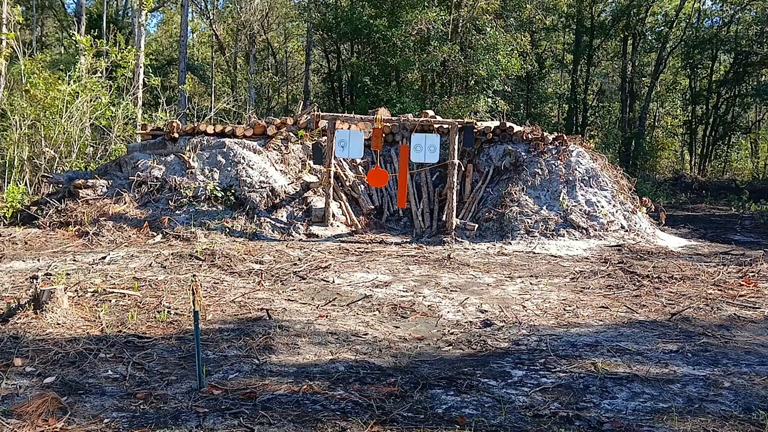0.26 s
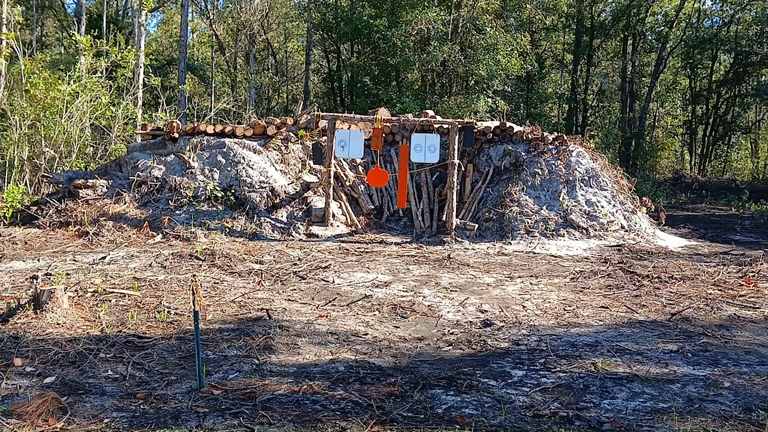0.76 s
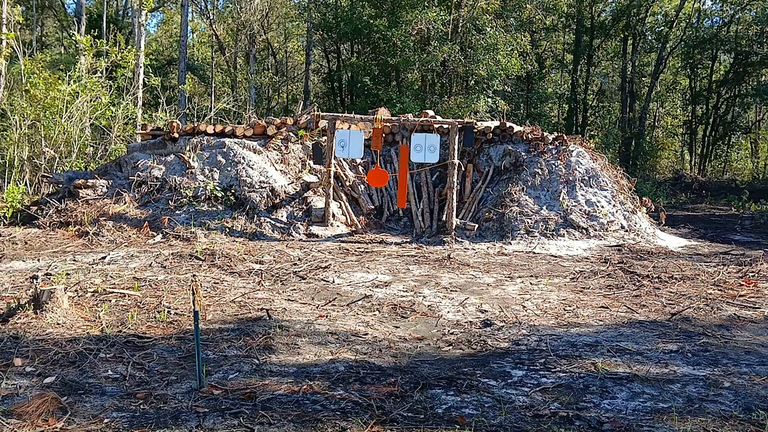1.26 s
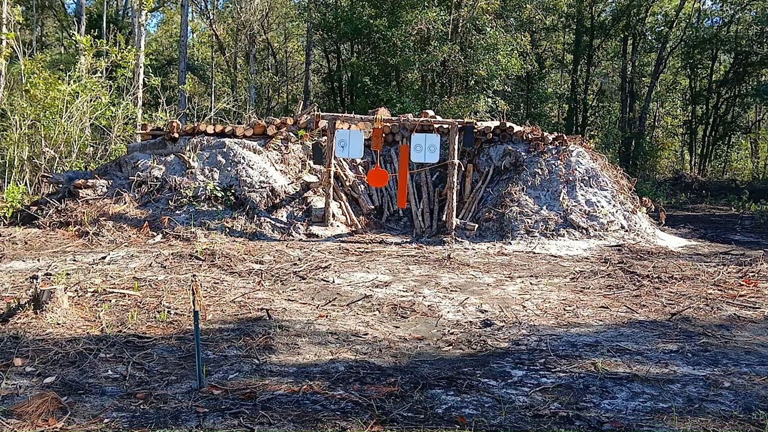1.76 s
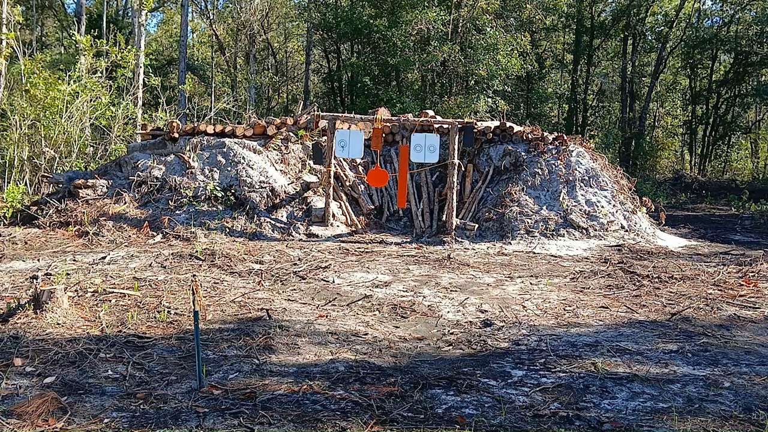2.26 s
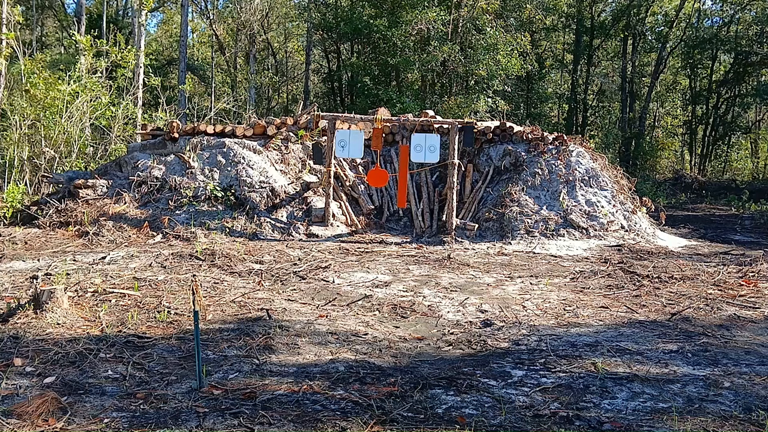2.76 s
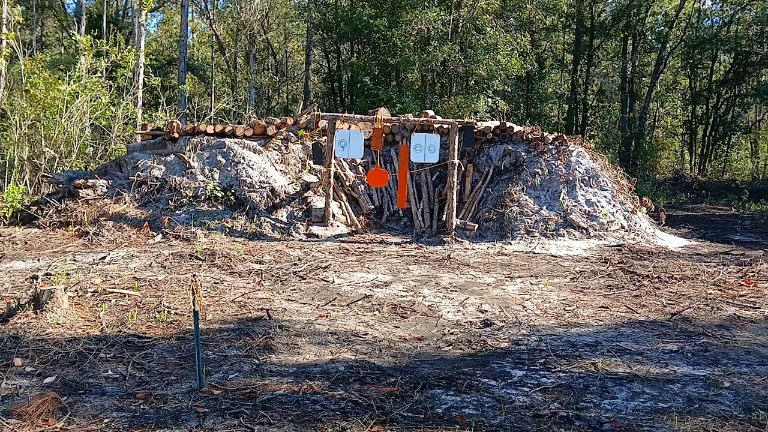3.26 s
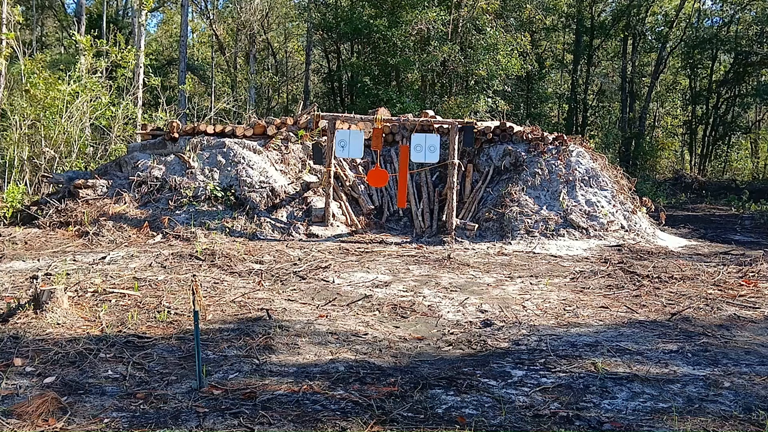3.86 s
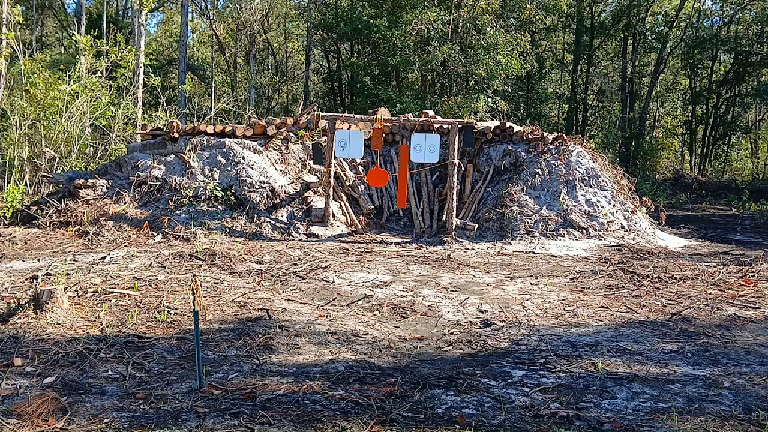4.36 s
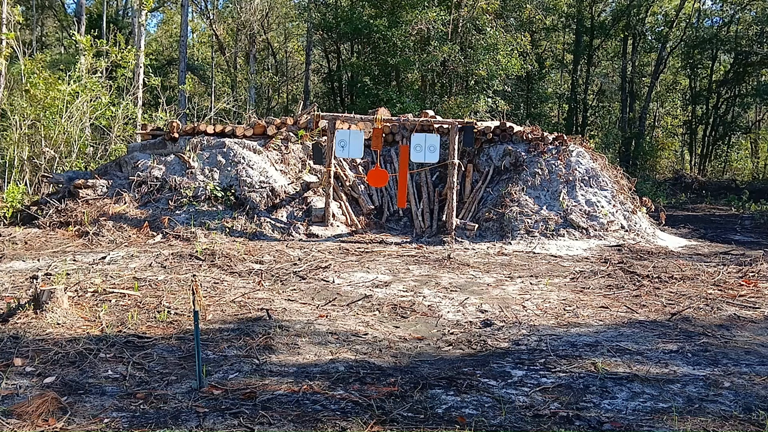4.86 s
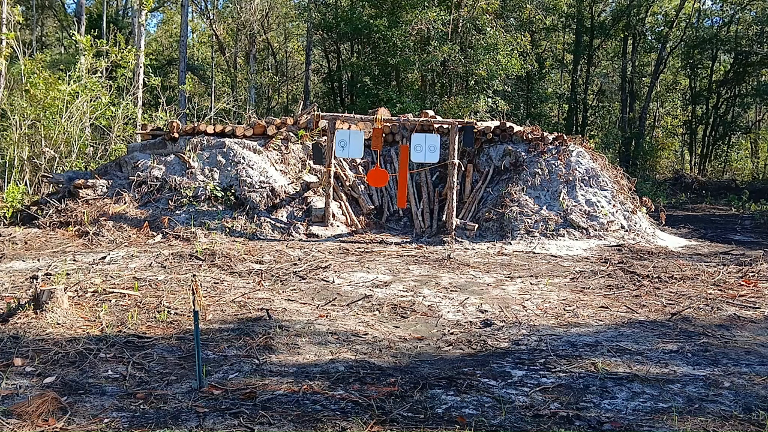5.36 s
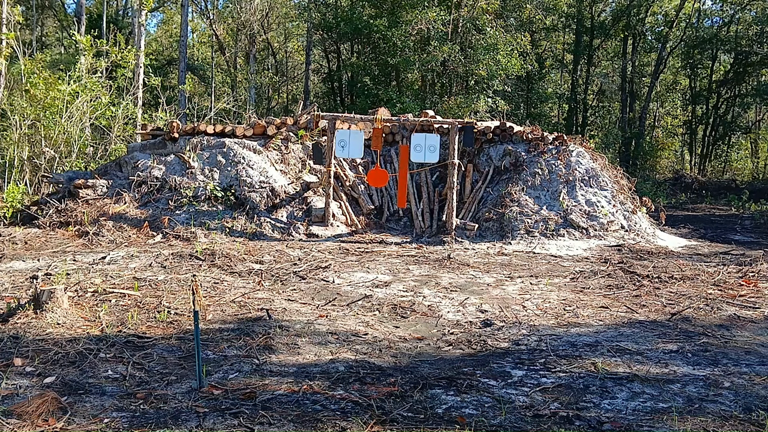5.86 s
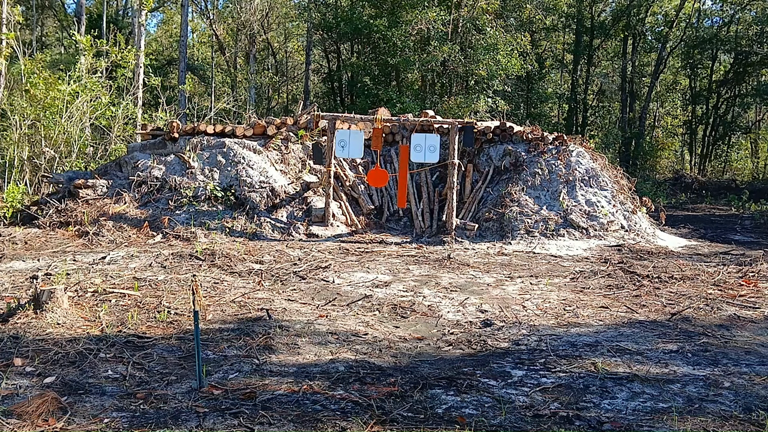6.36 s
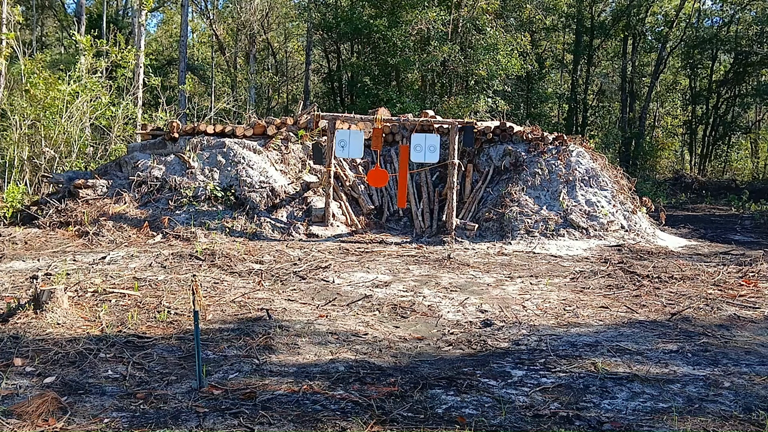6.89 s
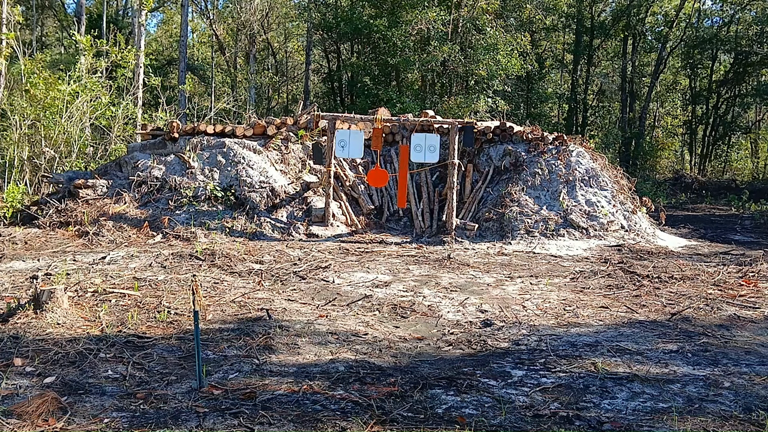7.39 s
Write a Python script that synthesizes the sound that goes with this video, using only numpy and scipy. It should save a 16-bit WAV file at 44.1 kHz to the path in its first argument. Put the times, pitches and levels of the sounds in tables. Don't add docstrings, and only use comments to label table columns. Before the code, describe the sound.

Close stereo microphone beside the shooter in woods. A bird chips and whistles over faint crickets and leaf hiss, then one dry air-gun snap is followed a tenth of a second later by a much louder, sharp metallic smack with a short clang and woody reverberation. The background sinks and recovers as a far engine swells. Hard steel reloading clacks come next, then repeated birdsong and a faint motor hiss and whine growing to the end.

```python
import sys
import numpy as np
from scipy import signal
from scipy.io import wavfile
from scipy.ndimage import uniform_filter1d

SR = 44100
rng = np.random.default_rng(int(sys.argv[2]) if len(sys.argv) > 2 else 0)


def to_wav(sig):
    pcm = np.clip(np.atleast_2d(sig), -1, 1) * 32767
    pcm = np.round(pcm).astype(np.int16)
    wavfile.write(sys.argv[1], SR, pcm.T)


def makeup_ratio(level_db):
    decades = np.asarray(level_db, float) / 20
    return 10 ** decades


N = 336465
T = np.arange(N) / SR

# time in seconds, level in dB, width in seconds.
STRIKES = [
    (1.7553, -2.0, .00003),
    (1.7563, -1.5, .00005),
]
# frequency in Hz, density in dB per Hz.
SPLASH = [(120, -55.5), (330, -34.5), (770, -3.5), (1270, -15), (2860, -3.5), (3500, -7), (4130, -4),
          (6900, -11.5), (8700, -4), (10300, -7), (12500, -4.5), (15300, -7), (16500, -11)]
# frequency in Hz, left-right likeness from 0 to 1.
WOODS_SAME = [(60, .88), (600, .88), (1400, .7), (3000, .45), (6000, .05), (15000, 0)]


def impact():
    out, t = np.zeros((2, N)), np.arange(3 * SR) / SR
    for s, db, width in STRIKES:
        u = (t[:200] - t[20]) / width
        add(out, s - t[20], -makeup_ratio(db) * (1 - u ** 2) * np.exp(-u ** 2 / 2))
    decay = makeup_ratio(-18.0 - 60 * t / 0.45) + makeup_ratio(-24.0 - 60 * t / 0.067)
    lead = evened(noise(SPLASH, WOODS_SAME, count=len(t), size=256))
    add(out, STRIKES[0][0], decay * lead)
    return out


# frequency in Hz, density in dB per Hz.
WOODS = [(59, -46), (100, -19), (167, -17.5), (211, -25), (335, -20), (400, -2.5), (500, -19), (720, -3.5),
         (1120, -4.5), (1570, 5.5), (4580, -6.5), (6900, -10), (8700, -6), (15100, -8.5), (16500, -11)]
# frequency in Hz, time to fall 60 dB in seconds.
WOODS_T60 = [(150, 4), (300, 1.7), (480, 2.1), (740, 1.8), (1100, 1.0), (1700, .8), (2760, .72), (7280, .8),
             (11000, .75), (16000, .45)]


def woods():
    out, t = np.zeros((2, N)), np.arange(3 * SR) / SR
    low_echo_hz, low_echo_s = 560, 0.032
    crack = noise(WOODS, WOODS_SAME, count=len(t), size=1024, patchy_db=3.0, t60=WOODS_T60)
    bass = signal.filtfilt(*signal.butter(2, low_echo_hz, fs=SR), crack)
    crack = crack - np.exp(-(t / low_echo_s) ** 2) * bass
    lumps = evened(uniform_filter1d(rng.standard_normal(len(t)), size=900))
    crack = crack * makeup_ratio(1.0 * lumps)
    swell = 1 - np.exp(-t / 0.0091)
    add(out, STRIKES[0][0], makeup_ratio(-25.0) * swell * crack / np.std(crack[:, :4000]))
    return out


PLATE_HZ = [103, 149, 169, 184, 243, 276, 387, 416, 474, 576, 671, 699, 729, 819, 876, 898, 1018, 1050,
            1260, 1408, 1532, 1553, 1627, 1706, 1728, 1927, 2145, 2290, 2460, 3010, 3456]
# level in dB, time to fall 60 dB in seconds.
PLATE = [(-15.5, 3), (-17, 11), (-13, 2.7), (-20.5, 3.4), (-19.5, 0.91), (-21.5, 3.2), (-15.5, 3.2),
         (-18, 1.5), (-18, 2), (-17.5, 2.9), (-14, 2.2), (-6, 1.5), (-3, 1.78), (-11, 1.4), (-2, 1.2),
         (-7.5, 0.42), (-6.5, 1.3), (-4, 1.1), (-8, 0.88), (-8.5, .6), (-2, 0.56), (-3.5, .75),
         (-0.5, 0.76), (-1.5, 0.71), (1.5, 0.31), (-1.5, 0.61), (2, 0.72), (0, 0.45), (-5.5, 0.38),
         (1.5, 0.15), (-11, 0.45)]


def plate():
    ring, t = np.zeros(N), np.arange(3 * SR) / SR
    sway_db = 1.0
    chance = rng.random((len(PLATE), 2, 5))
    for hz, (db, t60), (phase, spread) in zip(PLATE_HZ, PLATE, chance):
        cluster = hz * (1 + 0.033 * (spread - .5) * np.sign(np.arange(5)))
        tone = np.sin(2 * np.pi * (cluster[:, None] * t + phase[:, None])).T @ [1.3, .5, .5, .4, .4]
        swell = 1 - np.exp(-t * hz / 4.9)
        sway = np.sin(2 * np.pi * np.outer(t, 3 + 12 * spread[:3]) + 6 * phase[:3]).sum(axis=1)
        add(ring, STRIKES[0][0], makeup_ratio(db - 60 * t / t60) * swell * tone * makeup_ratio(sway_db * sway))
    return scatter(ring, 0.47, -12.0)


def target():
    return (impact() + woods() + makeup_ratio(-37.5) * plate()) * makeup_ratio(np.array([[-0.7], [0.7]]))


# time in seconds, level in dB, rise in seconds, time to fall 60 dB in seconds.
FIRING = [
    (1.6557, -27, 0.00058, 0.028),
    (1.662, -11.5, 0.0017, 0.0314),
    (1.7542, -30.5, .0003, .008),
    (1.755, -17.5, .0005, .03),
]
# frequency in Hz, density in dB per Hz.
HAMMER = [(120, -40), (400, -23), (799, -2), (1150, -4), (1500, -10), (2210, -6), (3630, -6), (4800, -12),
          (6100, -10.5), (7460, -6.5), (9660, -1.5), (12000, -6), (14000, -5), (16500, -10.5)]
# frequency in Hz, density in dB per Hz.
BLAST_ECHO = [(120, -36), (200, -9), (494, -5), (784, -10.5), (1900, -0.5), (3500, -7.5), (6500, -11.5),
              (9000, -3.5), (11800, -2.5), (14000, -3), (15600, -9.5), (16500, -14.5)]
# frequency in Hz, left-right likeness from 0 to 1.
ACTION_SAME = [(100, 0.99), (600, 0.27), (15000, 0.52)]


def blast():
    out, t = np.zeros((2, N)), np.arange(9000) / SR
    for s, db, rise, t60 in FIRING:
        hit = evened(noise(HAMMER, ACTION_SAME, count=len(t), size=256))
        add(out, s, makeup_ratio(db) * burst(rise, t60, t) * hit)
    echo = evened(noise(BLAST_ECHO, ACTION_SAME, count=len(t), size=256))
    add(out, 1.664, makeup_ratio(-33.0) * burst(0.0029, 0.92, t) * echo)
    out = ears(out, lag=-10.5)
    jolt_hz = 72 + 300 * np.exp(-t / .004)
    jolt = burst(.012, .16, t) * np.sin(2 * np.pi * np.cumsum(jolt_hz) / SR)
    add(out, 1.661, makeup_ratio(-22.0) * np.array([jolt, -.85 * np.roll(jolt, 25)]))
    return out


# frequency in Hz, width in Hz, level in dB.
STOCK = [
    (430, 320, -4),
    (596, 310, -20),
    (1390, 950, 0.5),
]


def contact(colour, db, hz, knock_db, drag):
    t = np.arange(6000) / SR
    slam = min(makeup_ratio(db + 18.0), 1)
    rise = drag * (.0008 + slam * .0018)
    t60 = drag * (.033 + slam * (.026 - .033))
    rattle = evened(noise(colour, ACTION_SAME, count=len(t), size=256))
    ring_share = 0.23 + 0.073 * (hz < 4500)
    rattle = rattle + ring_share * evened(resonate(rattle, hz, 380))
    dull_hz = 4500
    treble = signal.lfilter(*signal.butter(2, dull_hz, "high", fs=SR), rattle[:, ::-1])[:, ::-1]
    rattle = rattle - .2 * (hz < dull_hz) * treble
    shake = rng.standard_normal(len(t))
    crackle_db = 3.5 * evened(uniform_filter1d(shake, size=40))
    rattle = evened(rattle * makeup_ratio(crackle_db))
    wood = evened(sum(makeup_ratio(g) * resonate(shake, f, w) for f, w, g in STOCK))
    knock = wood * burst(0.0028, 0.14, t) * 2.7
    tick = burst(rise, .008, t) * np.sin(2 * np.pi * hz * t)
    tock = makeup_ratio(knock_db + 6) * burst(2 * rise, .016, t) * np.sin(2 * np.pi * 1250 * t)
    tap = 1.9 * (1 - slam) / (1 + drag ** 2) * 2 * (tick + tock)
    envelope = burst(rise, t60, t) + 0.82 * burst(rise, 0.017 * drag, t)
    return makeup_ratio(db - 13.5) * (envelope * rattle + makeup_ratio(knock_db) * knock + tap)


# time in seconds, peak level in dB, ring in Hz, stock knock in dB,
# drag as a ratio (.5 a clean tap, 2 a scrape).
CLICKS = [(0.5447, -46, 5600, -31, 1.2), (2.7833, -58, 8500, -25, .4), (2.9405, -55, 10500, -25, 1.1),
          (3.3693, -45, 8850, -25, .4), (3.374, -42, 4200, -26, 1.1), (3.4648, -52.5, 8300, -16, 1.1),
          (4.018, -40, 7960, -11.5, 1.4), (4.0668, -17.5, 4970, -31, 0.37), (4.0684, -16, 8300, -33, .6),
          (4.074, -32.5, 3740, -23, 1.4), (4.1445, -30, 4230, -14, 0.73), (4.4043, -40.5, 3230, -13, 0.92),
          (4.456, -38, 3620, -28, 1.2), (4.463, -32.5, 8100, -24, 2.5), (4.4667, -32, 3260, -26, 1.1),
          (4.5937, -17, 8100, -32, 0.38)]
# time in seconds, peak level in dB, ring in Hz, stock knock in dB, drag ratio.
DAMPED = [(2.44, -53, 3200, -20, .5), (2.519, -52, 3970, -16, .6), (3.353, -33, 3770, -15.5, .43),
          (3.389, -47, 4200, -20, 0.82), (3.918, -33.5, 3400, -18, 1.3), (3.927, -46, 3500, -18, 1),
          (4.028, -39.5, 5200, -13, 1.2), (4.15, -38.5, 8200, -11, 1.2), (4.157, -39, 3900, -16, 1.1),
          (4.471, -38, 2200, -16, 1.2), (4.535, -47, 4000, -15, 2.3), (4.541, -30.5, 6300, -21, 1),
          (4.5505, -33.5, 7500, -14, 1), (4.552, -32, 2240, -13, 1.4), (4.569, -42, 4460, -15, .9),
          (4.581, -45, 1170, -6, 3.6), (4.596, -24.5, 1940, -25, 0.95), (4.628, -46, 3340, -5, 1.3)]
# frequency in Hz, density in dB per Hz.
ACTION = [(880, -29), (1500, -14), (1950, -7.5), (2500, -12), (4480, -7.5), (6560, -9.5), (8170, -7),
          (9990, -8.5), (11800, -6), (15100, -9.5), (16500, -21.5)]
# frequency in Hz, density in dB per Hz.
DAMPED_ACTION = [(880, -31), (1500, -12), (2200, -4), (4480, -10), (6560, -13.5), (8500, -8.5),
                 (10500, -12), (13000, -20), (16500, -34)]
# time in seconds, level in dB, frequency in Hz,
# time to fall 60 dB in seconds.
KNOCKS = [(1.662, -41.5, 240, 0.18), (1.662, -36.5, 460, .07), (4.074, -56, 400, .12),
          (4.145, -56, 610, .1), (4.484, -49.5, 480, 0.052), (4.486, -51, 1100, .05),
          (3.355, -44.5, 1300, .04), (4.067, -29, 11900, 0.0076), (4.0688, -25, 8500, 0.0076),
          (4.5941, -29.5, 11300, 0.0055), (4.5943, -30, 3700, 0.0067), (4.5957, -30, 8000, 0.01),
          (4.5942, -33, 15000, 0.007), (4.4672, -38, 3260, .015)]


def action():
    out, t = np.zeros((2, N)), np.arange(6000) / SR
    for colour, clicks in [(ACTION, CLICKS), (DAMPED_ACTION, DAMPED)]:
        for s, db, hz, knock_db, drag in clicks:
            add(out, s, contact(colour, db, hz, knock_db, drag))
    for s, db, hz, t60 in KNOCKS:
        add(out, s, makeup_ratio(db) * burst(1 / hz, t60, t) * np.sin(2 * np.pi * hz * t))
    return ears(scatter(out, 0.89, -15.0), lag=-11, pan_db=-1.0)


# start in seconds into the song, length in seconds, level in dB, start and end in Hz.
SONG = [(.338, 0.029, -45.5, 2490, 2484), (.364, .036, -58, 2467, 2456), (0.4, 0.027, -44, 2767, 3036),
        (0.418, 0.0095, -43, 3040, 3280), (0.425, 0.01, -40.5, 3160, 2750),
        (0.449, 0.028, -43.5, 3070, 2730), (.503, 0.018, -60, 2350, 2150), (.52, .018, -58.5, 2120, 1810),
        (.562, .022, -59, 1800, 2060), (.58, 0.055, -57.5, 2070, 2143), (0.671, .02, -53, 2210, 2313),
        (0.691, 0.015, -46.5, 2495, 2350), (.72, .017, -62, 2500, 2620)]


def whistles():
    song, attack_s, release_s = np.zeros(SR), 0.0036, 0.0047
    for s, length, db, start_hz, end_hz in SONG:
        t = np.arange(0, length, 1 / SR)
        u = t / length
        hz = start_hz + (end_hz - start_hz) * u ** 1.25
        shape = np.clip(np.minimum(t / attack_s, (length - t) / release_s), 0, 1) * makeup_ratio(db - u ** 2)
        add(song, s, shape * np.sin(2 * np.pi * np.cumsum(hz) / SR))
    return song


# start in seconds into the song, level in dB, top in Hz, end in Hz.
TRILL = [
    (.243, -44, 3760, 3130),
    (.261, -42.5, 3600, 2880),
    (.279, -40.5, 3427, 2650),
    (.296, -41, 3160, 2600),
    (.312, -43.5, 2880, 2450),
    (.328, -48, 2680, 2480),
]


def fast_trill():
    song, length, hook_hz, hook_share = np.zeros(SR), 0.0157, 450, 0.45
    u = np.arange(0, 1, 1 / SR / length)
    for s, db, top_hz, end_hz in TRILL:
        hz = np.interp(u, [0, hook_share, 1], [top_hz - hook_hz, top_hz, end_hz])
        hz = uniform_filter1d(hz, size=90)
        add(song, s, makeup_ratio(db) * np.sin(np.pi * u) * np.sin(2 * np.pi * np.cumsum(hz) / SR))
    return song


# multiple of the fundamental, level in dB.
NASAL_ORDERS = [(12, -6), (14, -8), (15, -5), (16, -2), (17, 0), (18, 1), (19, 0), (20, 0), (21, -4),
                (22, -1), (23, -7), (24, 0), (25, -6), (26, 0)]
# frequency in Hz, gain in dB.
BEAK = [(3500, -17), (3900, -11), (4200, -4), (4650, -6), (4950, -16), (5300, -17), (5700, -19),
        (6300, -28)]


def nasal_note():
    length = .19
    t = np.arange(0, length, 1 / SR)
    u = t / length
    hz = 232 * (1 - 12.5 * (t - .112) ** 2 - 0.067 * u ** 14)
    beak_open_db = 7.0 * np.sin(np.pi * u ** 0.39) ** 0.061
    wobble = .03 * uniform_filter1d(rng.standard_normal(len(t)), size=400)
    turns = np.cumsum(hz * (1 + wobble)) / SR
    flicker = rng.standard_normal((len(NASAL_ORDERS), len(t)))
    flicker = evened(uniform_filter1d(uniform_filter1d(flicker, size=500), size=500))
    note = 0
    for f, (k, order_db) in zip(flicker, NASAL_ORDERS):
        db = -66.0 + 2.6 * f + order_db
        if k > 14:
            db = db + beak_open_db + read(BEAK, k * hz)
        if k == 14:
            db = db - 9.0 * (0.5 - 2 * t / t[-1])
        note = note + makeup_ratio(db) * np.sin(2 * np.pi * k * turns + k * k)
    return note * signal.windows.tukey(len(t), .12)


# start in seconds, level in dB, level of the nasal note in dB.
SINGS = [
    (0.619, 0.5, 6.5),
    (4.981, 0.5, 5),
]
# time in seconds, level in dB, start in Hz, end in Hz, length in seconds.
CHIPS = [(0.286, -53, 6950, 7010, 0.028), (0.322, -52.5, 6950, 7000, 0.018),
         (0.294, -69, 10300, 10400, .03), (0.31, -59, 3200, 2500, 0.0086), (.284, -61, 5400, 6900, .01),
         (.29, -62, 3450, 3480, .022), (0.311, -49, 6750, 4400, 0.011), (0.545, -52, 5630, 4050, 0.0186),
         (0.554, -54, 6300, 5700, .02), (1.443, -46.5, 4610, 6300, 0.015),
         (4.647, -51.5, 7600, 7250, 0.026), (5.8, -43, 3900, 6850, 0.015)]


def bird():
    out, song, nasal = np.zeros(N), whistles() + fast_trill(), nasal_note()
    for s, db, nasal_db in SINGS:
        add(out, s, makeup_ratio(db) * song)
        add(out, s, makeup_ratio(nasal_db) * nasal)
    for s, db, start_hz, end_hz, length in CHIPS:
        hz = np.linspace(start_hz, end_hz, round(length * SR))
        add(out, s, makeup_ratio(db) * np.sin(2 * np.pi * np.cumsum(hz) / SR) * np.hanning(len(hz)))
    return ears(scatter(out, 0.48, -7), lag=17, pan_db=-2.0)


# start in seconds, end in seconds.
LOW_TRILL = [(0, 0.25), (.74, 1.06), (1.5, 1.9), (2.36, 2.52), (3.0, 3.23), (3.91, 4.04), (4.66, 4.93),
             (5.48, 5.7)]
# start in seconds, end in seconds.
HIGH_TRILL = [(0, .3), (.55, .8), (1.02, 1.22), (1.45, 1.8), (2.22, 2.46), (2.66, 2.86)]
# start in seconds, end in seconds.
CRICKET = [(0, .69), (.85, 1.6), (2.44, 3.03), (3.2, 4.1), (3.48, 3.82), (4.15, 4.5), (4.62, 5.05),
           (5.5, 6.1)]
# start in seconds, end in seconds.
RASPS = [
    (1.45, 1.56),
    (5.81, 5.92),
]


def insects():
    cricket_hz = 3450
    fuzz = evened(resonate(rng.standard_normal((2, N)), cricket_hz, 22))
    out = bouts(CRICKET, -79.0) * evened(np.sin(2 * np.pi * cricket_hz * T) + .4 * fuzz)
    out = out + bouts(RASPS, -69.0, .01) * evened(resonate(rng.standard_normal((2, N)), 12200, 1300))
    # bouts, level in dB, pitch in Hz, strokes per second, sweep in Hz
    for rows, db, hz, per_s, sweep_hz in [(LOW_TRILL, -74.5, 6700, 46, 1400), (HIGH_TRILL, -81.5, 7750, 55, 650)]:
        pace = per_s * (1 + 4.3 * uniform_filter1d(rng.standard_normal(N), size=900))
        stroke = (np.cumsum(pace) / SR) % 1
        tone = np.sin(2 * np.pi * np.cumsum(hz + sweep_hz * (.9 - 1.4 * stroke)) / SR)
        tone = tone * np.sin(np.pi * np.clip(stroke / .7, 0, 1)) ** 2
        out = out + scatter(bouts(rows, db) * evened(tone), .15, -5.0)
    return out


# frequency in Hz, level in dB.
WHINE = [(3618, -81), (4247, -79), (4538, -80), (4651, -81), (5168, -80), (5426, -84), (5685, -82),
         (5798, -83), (5943, -82), (6202, -75), (6460, -81), (6718, -74), (7752, -70), (8010, -83),
         (8161, -81), (8419, -82)]


def whine():
    late_hz, late_s = (4538, 4651, 5168, 6202, 6718), 6.7
    load_s, load_shift_db = 7.25, {4651: 4.0, 5168: 2.0, 6718: 3.0, 8161: 4.0, 7752: -5.0}
    late = np.clip(late_s + .4 - T, 0, 1)
    load = np.clip((T - load_s) / .25, 0, 1)
    lines = 0
    for (hz, db), (phase, pace) in zip(WHINE, rng.random((len(WHINE), 2))):
        db = db - 3 * (hz < 4600) - 9 * (hz in late_hz) * late + load_shift_db.get(hz, 0) * load
        swell_db = 3 * np.sin(2 * np.pi * (1 + 2.5 * pace) * T + hz)
        lines = lines + makeup_ratio(db + swell_db) * np.sin(2 * np.pi * (hz * T + phase))
    thin = bouts([(5.5, 6.6)], -80, .3) * evened(resonate(rng.standard_normal((2, N)), 11584, 52))
    return spin(4.0, 2.1) * ears([lines], lag=1) + thin


# time in seconds, level in dB.
ENGINE = [
    (0, -58),
    (1.5, -52.5),
    (3.0, -38.5),
    (4.0, -48.5),
    (5.2, -41.5),
    (6.0, -44),
    (7.63, -45.5),
]
# frequency in Hz, width in Hz, level in dB.
ENGINE_LINES = [
    (80.98, 6.8, -2),
    (103.45, 4.7, -15.5),
    (64.3, 8.8, -11.5),
    (148.3, 4, -23),
    (184.5, 5.4, -26),
    (290.6, 5.6, -23.5),
]


def engine():
    lines = np.sqrt(2) * .9 * np.sin(2 * np.pi * 81.3 * T)
    for hz, width, db in ENGINE_LINES:
        drive = rng.standard_normal(N)
        lines = lines + makeup_ratio(db) * evened(resonate(resonate(drive, hz, width), hz, width))
    near_db = np.interp(T, *np.transpose(ENGINE))
    return makeup_ratio(near_db - 3.5 + 2.3 * np.minimum(gain_control(), 0)) * lines


# frequency in Hz, density in dB per Hz.
HISS = [(290, -19.5), (500, -13.5), (570, -17.5), (1040, -10), (2600, -6), (3550, -2.5), (5190, -17),
        (7170, -19), (7940, -22.5), (14000, -22), (15800, -22.5), (16500, -25.5)]
# frequency in Hz, density in dB per Hz.
RUMBLE = [(8.8, -66.5), (15, -37.5), (32, -28), (57, -15.5), (80, 1), (113, -8.5), (130, -19.5),
          (160, -15.5), (186, -26), (276, -21.5), (376, -32.5), (395, -40.5), (900, -36.5), (1170, -70),
          (1980, -120)]
# frequency in Hz, density in dB per Hz.
MOTOR_HISS = [(2500, -44), (3800, -7), (4600, 0), (5600, -6), (6500, -7), (7600, 2.5), (8200, 0),
              (9200, -8.5), (12000, -10)]
# frequency in Hz, left-right likeness from 0 to 1.
SAME = [(60, 1), (150, 0.8), (300, 0.68), (600, 0.57), (1200, 0.021), (5000, 0.12), (15000, 0.055)]


def air():
    layers = (-56, 1.2), (-75.5, 0.93), (-57.5, 0.49), (-52, 0.43)
    top_gain, mid_gain, low_gain, ground_gain = [makeup_ratio(db + share * gain_control()) for db, share in layers]
    hiss = evened(noise(HISS, SAME, patchy_db=2.0))
    low = signal.sosfiltfilt(signal.butter(2, 1800, fs=SR, output="sos"), hiss)
    mid = signal.sosfiltfilt(signal.butter(2, 5000, fs=SR, output="sos"), hiss) - low
    hiss = top_gain * (hiss - low - mid) + mid_gain * mid + low_gain * low
    motor = spin(-66, 2.7) * evened(noise(MOTOR_HISS, SAME, patchy_db=.4))
    rumble = evened(noise(RUMBLE, SAME, size=4096, patchy_db=-1.0))
    return ears(hiss + motor, lag=19, pan_db=-3.0) + ears(ground_gain * rumble, lag=10)


def gain_control():
    shot_s, sink_s, hold_until_s, recover_s, creep_s = 1.77, 0.83, 2.95, 0.72, 0.78
    duck_db, creep_db = -7.5, 2
    up = hold_until_s + recover_s
    times = [shot_s, shot_s + sink_s, hold_until_s, up, up + creep_s]
    return np.interp(T, times, [0, duck_db, duck_db, 0, creep_db])


def spin(db, growth):
    on_s, spin_up_s = 4.27, 2.18
    return makeup_ratio(db) * np.clip((T - on_s) / spin_up_s, 0, 1.2) ** growth


def bouts(rows, db, edge=0.059):
    gate = sum(np.clip(np.minimum(T - a + 1e-3, b - T) / edge, 0, 1) for a, b in rows)
    return makeup_ratio(db + 0.61 * gain_control()) * gate


def burst(rise, t60, t):
    return np.clip(t / max(rise, 1e-4), 0, 1) * makeup_ratio(-60 * np.maximum(t - rise, 0) / max(t60, .005))


def resonate(x, hz, width):
    turn = np.exp(2j * np.pi * hz * np.arange(x.shape[-1]) / SR)
    r = np.exp(-np.pi * width / SR)
    return 2 * (turn * signal.lfilter([1 - r], [1, -r], x / turn)).real


def noise(colour, same, count=N, size=1024, patchy_db=0., t60=None):
    frames, hz = 4 * count // size + 5, np.fft.rfftfreq(size, 1 / SR)
    a, b, c, d, patches = rng.standard_normal((frames, len(hz), 5)).T
    patches = evened(uniform_filter1d(uniform_filter1d(patches, size=8, axis=0), size=12, axis=1))
    like = np.clip(read(same, hz), -1, 1)[:, None]
    left = a + 1j * b
    right = like * left + np.sqrt(1 - like ** 2) * (c + 1j * d)
    z = np.array([left, right]) * makeup_ratio(read(colour, hz)[:, None] + patchy_db * patches)
    z = z / np.sqrt(np.mean(abs(z) ** 2) / size * 3 / 4)
    if t60:
        seconds = np.arange(frames) * size / 4 / SR
        z = z * makeup_ratio(-60 * seconds / np.clip(read(t60, hz), .05, 9)[:, None])
    return signal.istft(z, nperseg=size, noverlap=3 * size // 4)[1][:, :count] / size


def scatter(x, t60, wet_db):
    count = round(t60 * SR)
    taps = rng.standard_normal((2, SR))[:, :count] * (rng.random((2, SR))[:, :count] < .1)
    taps = taps * makeup_ratio(-60 * np.arange(taps.shape[1]) / count)
    taps = taps / np.linalg.norm(taps[0])
    return x + makeup_ratio(wet_db) * signal.fftconvolve(np.atleast_2d(x), taps, axes=1)[:, :N]


def ears(x, lag, pan_db=-1.5):
    return np.array([makeup_ratio(pan_db) * np.roll(x[0], lag), x[-1]])


def evened(x):
    return x / np.sqrt(np.mean(x ** 2) + 1e-20)


def read(points, hz):
    f, value = np.transpose(points)
    return np.interp(np.log(hz + 1), np.log(f + 1), value)


def add(mix, s, sound):
    part = mix[..., round(s * SR):][..., :sound.shape[-1]]
    part += sound[..., :part.shape[-1]]


def scene():
    return target() + blast() + action() + bird() + insects() + whine() + engine() + air()


def top_cut(x):
    return signal.sosfilt(signal.butter(12, 16980, fs=SR, output="sos"), x)


def record(dry):
    low_pass = signal.firwin(201, 16000, window=("kaiser", 4), fs=SR)
    limited = signal.oaconvolve(dry, low_pass[None], "same")
    return top_cut(limited)


dry = scene()
out = record(dry)
to_wav(out)
```